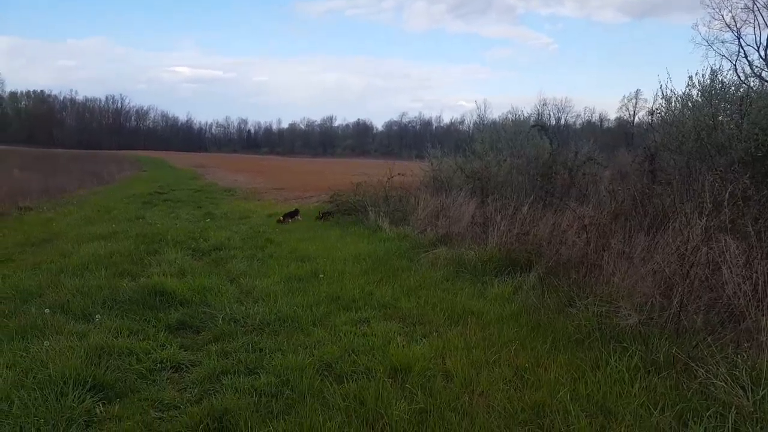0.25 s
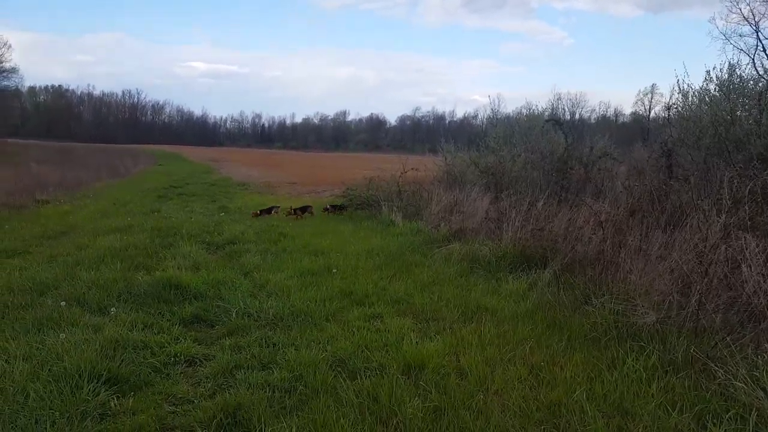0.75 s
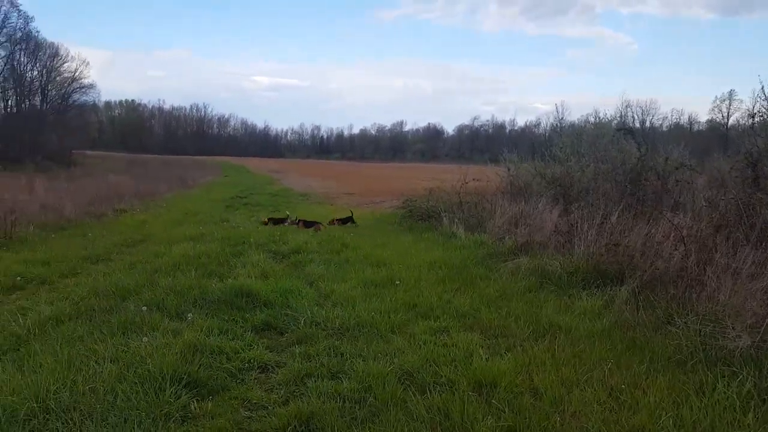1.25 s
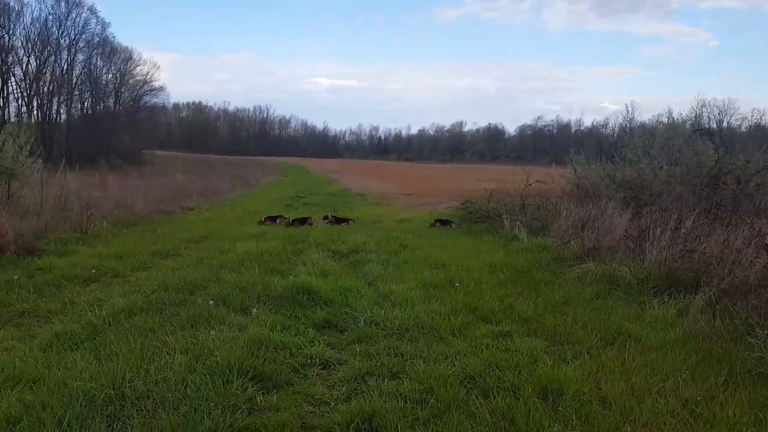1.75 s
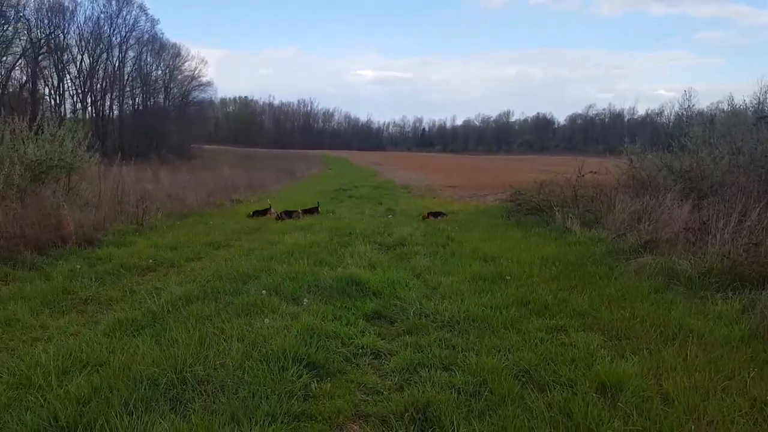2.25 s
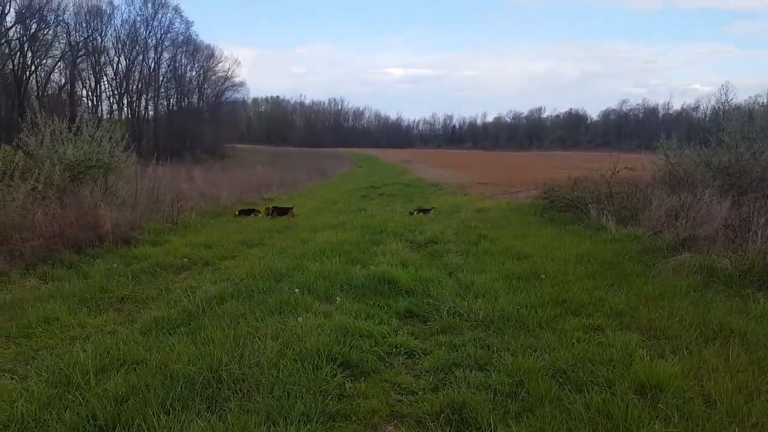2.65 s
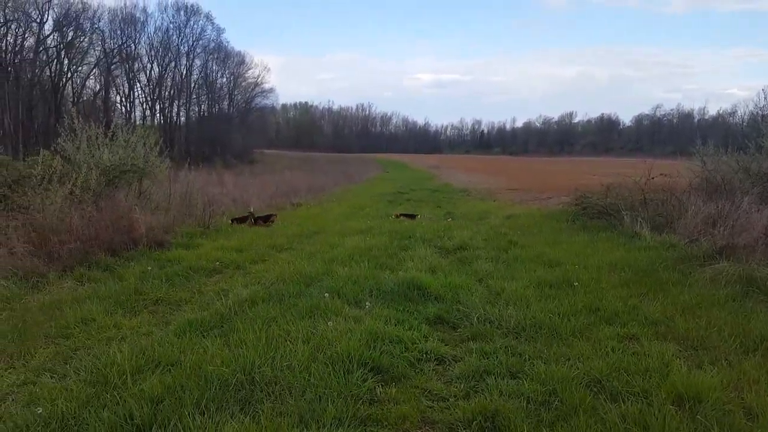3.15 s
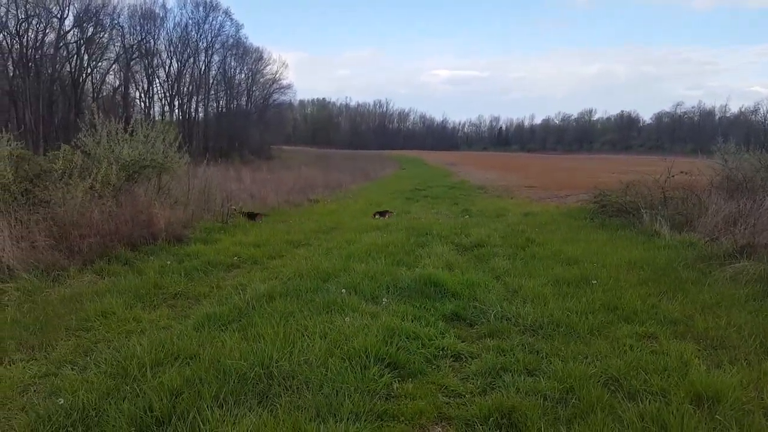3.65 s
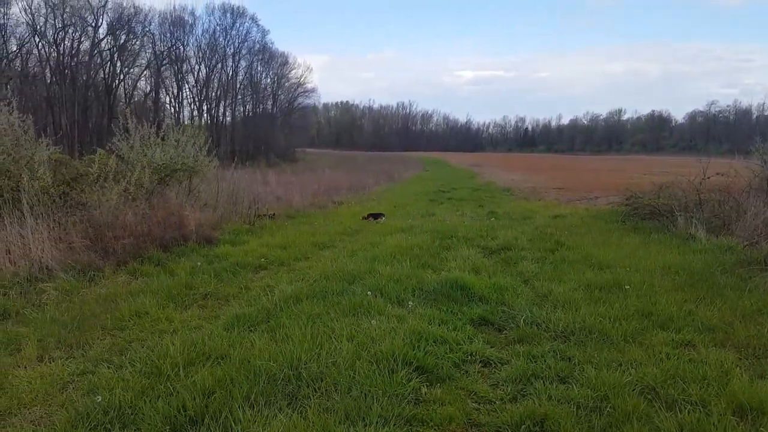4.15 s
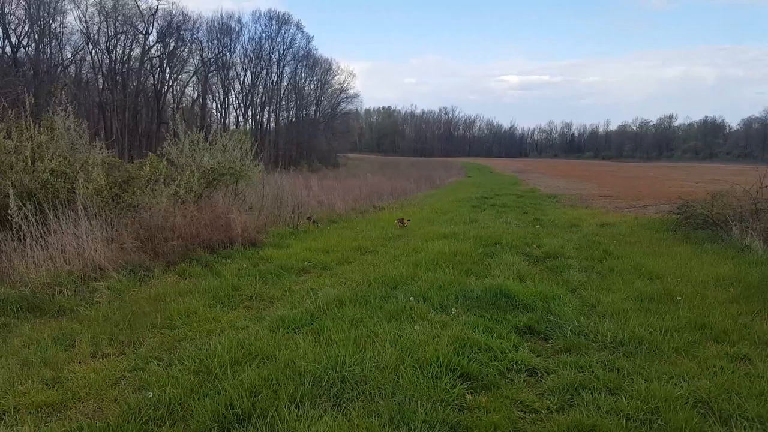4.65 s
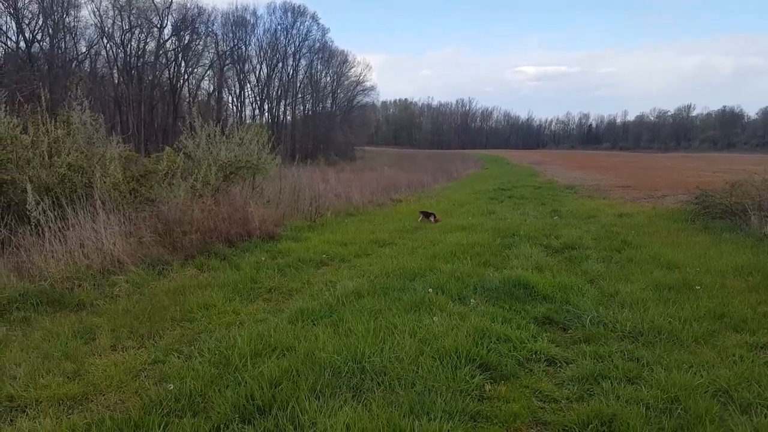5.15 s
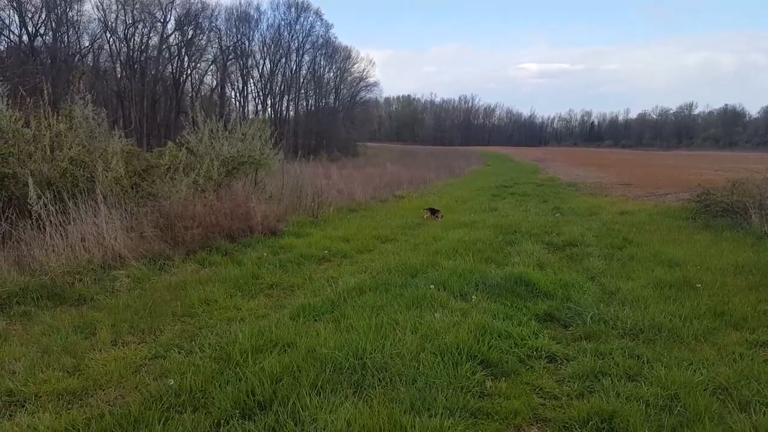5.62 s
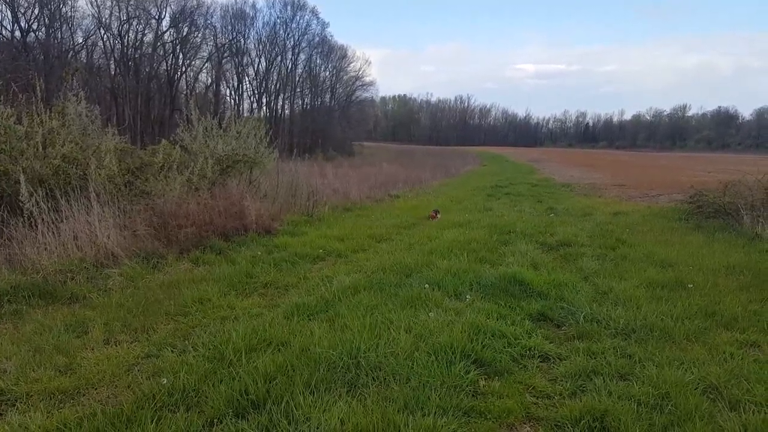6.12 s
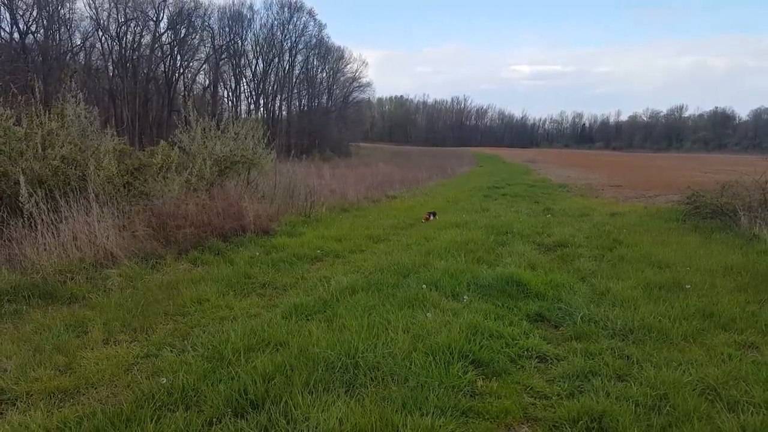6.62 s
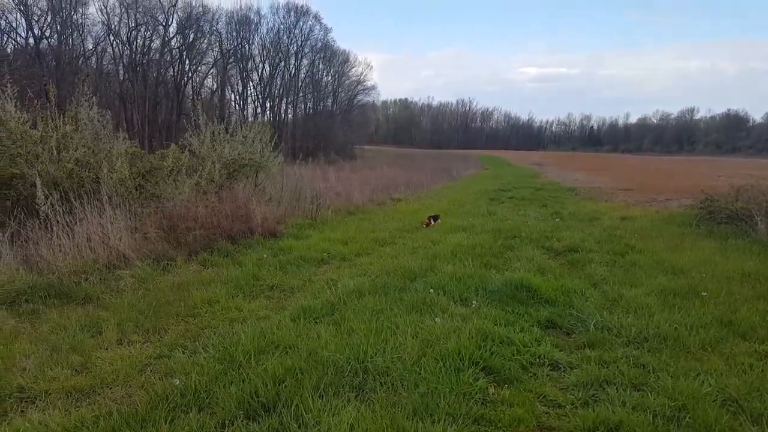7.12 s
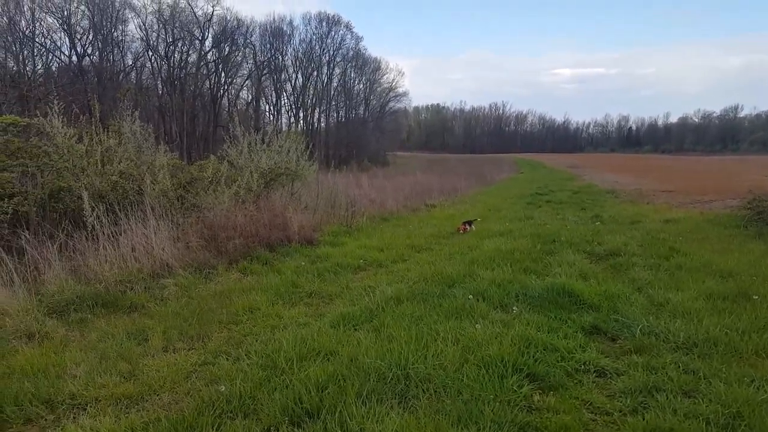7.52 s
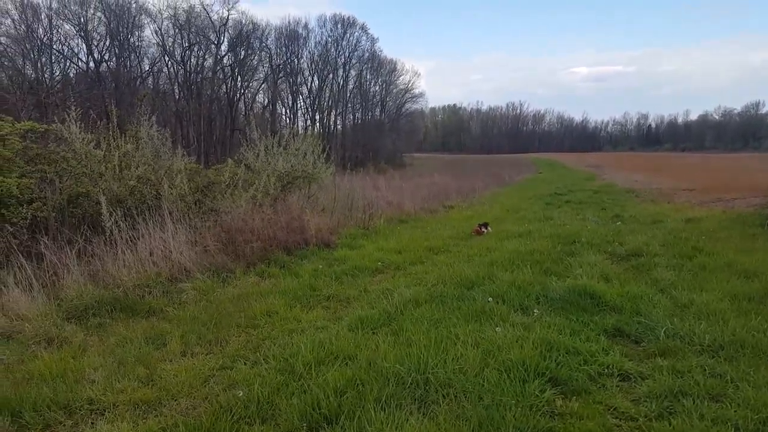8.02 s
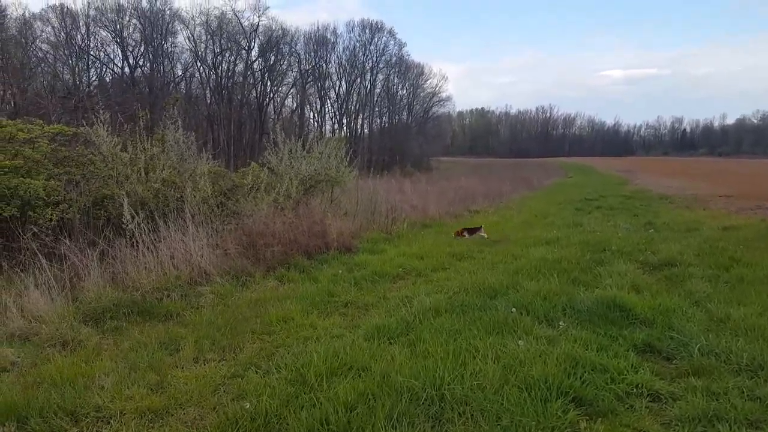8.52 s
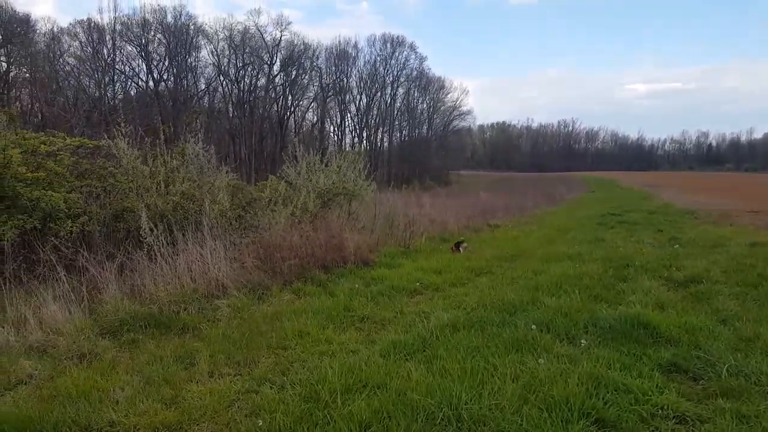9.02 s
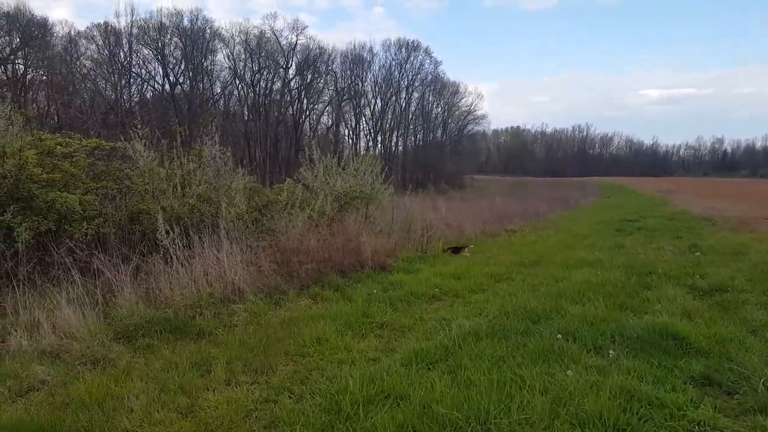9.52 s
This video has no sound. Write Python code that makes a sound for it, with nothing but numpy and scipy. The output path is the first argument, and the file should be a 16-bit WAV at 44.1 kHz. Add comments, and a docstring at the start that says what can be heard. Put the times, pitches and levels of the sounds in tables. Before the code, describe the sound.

A pack of hounds bays, yelps and barks hoarsely across an open field, pausing mid-way while birds whistle, then resuming with woodland echoes.

```python
"""A pack of hounds crosses a field some way off, and the tree lines answer: bays and yelps are stacks of
sine partials on a sliding pitch, barks an uneven mouth resonance with broken partials and pulsed noise.
Birds whistle in gliding sines and an insect trills; grass crackles near the microphones as shaped noise,
with snaps, knocks and a thin ping. Filtered noise makes the distant rumble, wind, low drone and far
engine. Noise echoes spread the calls through the woods; phase leads place them between two microphones."""
import sys
import numpy as np
from scipy import signal
from scipy.fft import rfft, irfft, next_fast_len
from scipy.io import wavfile
from scipy.ndimage import uniform_filter1d, map_coordinates

SR = 44100
rng = np.random.default_rng(int(sys.argv[2]) if len(sys.argv) > 2 else 0)


def transcribe(u):
    """Save the signal u as a 16-bit wav file named by the first command-line argument.

    u: samples, shape (n,) or (channels, n), limited to [-1, 1]; the rate is SR.
    q: integer samples, one column per channel.
    """
    v = np.clip(np.atleast_2d(u).T, -1, 1)
    q = np.round(v * 32767).astype(np.int16)
    wavfile.write(sys.argv[1], SR, q)


N = 430857
T = np.arange(N) / SR
TOP_HZ = 15830  # band limit
FALL_DULLS_DB = -4.5  # extra loss of overtones as a call falls away

# slope of the hounds' throats: freq_hz, relative_db
THROAT = [(500, -2.5), (1200, 5.5), (1700, -4.5), (2200, -16.5), (2800, -17.5), (3300, -25.5),
          (4500, -23.5), (6000, -39.5), (9000, -47.5), (15000, -78.5)]
# noisy body of a hoarse voice: freq_hz, relative_db
RASP = [(150, -52.5), (250, -35.5), (318, -11), (397, -24.5), (589, -9.5), (736, 1.5), (858, -7),
        (1480, -14), (2440, -19), (4300, -40.5), (5950, -36), (15000, -67)]


def amp(db):
    """Decibels to amplitude."""
    return 10 ** (np.asarray(db) / 20)


def unit(x):
    """Scale to an rms of one."""
    return x / np.sqrt(np.mean(x ** 2) + 1e-20)


def along(points, hz):
    """Read a curve of (Hz, value) points on a log frequency axis."""
    f, v = np.transpose(points)
    return np.interp(np.log(hz + 1), np.log(f + 1), v)


def span(rows, edge=.003):
    """Sample slice, times, soft ends (edge in s) and one curve per column of a call."""
    s, *cols = np.transpose(rows)
    cut = slice(max(0, round(s[0] * SR)), min(N, round(s[-1] * SR)))
    t = T[cut]
    ends = np.clip(np.minimum(t - s[0], s[-1] - t) / edge, 0, 1)
    return cut, t, ends, [np.interp(t, s, c) for c in cols]


def wobble(rate, size=N):
    """A smooth random curve, rate knots a second."""
    knots = rng.standard_normal(int(size * rate / SR) + 4)
    return map_coordinates(knots, [np.arange(size) * rate / SR])


def filtered(x, response):
    """Shape the spectrum of x by a response of frequency, which may be complex."""
    m = next_fast_len(x.shape[-1] + 8192)
    return irfft(rfft(x, m) * response(np.fft.rfftfreq(m, 1 / SR)), m)[..., :x.shape[-1]]


def phase(hz):
    """Running phase in radians of a changing pitch."""
    return 2 * np.pi * np.cumsum(hz) / SR


def stack(hz, multiples, dbs, shimmer_db):
    """Partials of one voice; they tremble in level and phase, the high ones most."""
    turn = phase(hz)
    out = np.zeros(len(hz))
    for k, db in zip(multiples, dbs):
        height = k * np.mean(hz) / 2500
        tremble_db = shimmer_db * (1 + height) * np.tanh(wobble(70, size=len(hz)))
        blur = .45 * height ** 2 * wobble(150, size=len(hz)) + rng.uniform(0, 2 * np.pi)
        level = np.sqrt(2) * amp(db + tremble_db) * (k * hz < TOP_HZ)
        out += level * np.sin(k * turn + blur)
    return out


def pulsed_noise(hz):
    """Air noise let through once a cycle by the vocal folds."""
    return (1 + np.cos(phase(hz))) * rng.standard_normal(len(hz))


def breath(hz, db):
    """Pulsed air noise, coloured by the throat."""
    return amp(db) * unit(filtered(pulsed_noise(hz), lambda f: amp(along(RASP, f))))


def high_voice(calls):
    """A higher register than the bays: few, widely spaced partials down the throat's slope."""
    out = np.zeros(N)
    for rows in calls:
        cut, t, ends, (hz, *dbs) = span(rows)
        hz = hz * (1 + .002 * wobble(60, size=len(t)))
        second_throat_db = along(THROAT, 2 * hz)
        dbs += [dbs[1] - 11.5 + along(THROAT, k * hz) - second_throat_db for k in range(3, 10)]
        out[cut] += ends * (stack(hz, range(1, 10), dbs, shimmer_db=1.2) + breath(hz, dbs[0] - 24))
    return out


def yelp_shape(s, length, start_hz, mid_hz, end_hz, start_db, end_db, second_db, scoop, drop):
    """Scoop in, hold, drop away: rows (s, Hz, dB of partials 1, 2); wider pitch travel takes longer."""
    shortest_s, scoop_s_per_share, drop_s_per_share = .006, .03, .045
    scoop_db, drop_db = -10, -22.5
    mid_share = .42  # the middle pitch is reached a little early
    scoop_s = shortest_s + scoop_s_per_share * abs(1 - scoop)
    drop_s = 2 * shortest_s + drop_s_per_share * abs(1 - drop)
    return [(s - scoop_s, scoop * start_hz, start_db + scoop_db, second_db + scoop_db),
            (s, start_hz, start_db, second_db),
            (s + mid_share * length, mid_hz, (start_db + end_db) / 2, second_db),
            (s + length, end_hz, end_db, second_db),
            (s + length + drop_s, drop * end_hz, end_db + drop_db, second_db + drop_db + FALL_DULLS_DB)]


def yelps():
    """Short high yelps, each bending into and out of its held pitch."""
    # held part of each yelp: start_s, length_s, start_hz, mid_hz, end_hz, start_db, end_db,
    # second_partial_db, scoop_from (share of start_hz), drop_to (share of end_hz)
    yelp_rows = [(0.0, .11, 1429, 1259, 1372, -28.5, -23, -33.5, .99, 0.7),
                 (0.283, 0.044, 1480, 1440, 1398, -30.5, -22.5, -77, .99, .8),
                 (.36, .38, 1180, 1045, 1159, -28, -25, -37, .7, 1.2),
                 (.46, .04, 1367, 1310, 1224, -39, -35.5, -34, .99, 1.4),
                 (0.738, 0.018, 1333, 1388, 1340, -33, -23, -48.5, .8, 0.42),
                 (1.042, .03, 1323, 1287, 1233, -32.5, -38, -27.5, 1, 0.85),
                 (1.2, 0.085, 1004, 1100, 1167, -28.5, -27.5, -37, 0.65, 1.1),
                 (1.471, .03, 1225, 1267, 1270, -24.5, -28, -32.5, .93, 1.8),
                 (1.56, 0.029, 1292, 1210, 1247, -39, -20, -37.5, 1, .86),
                 (1.98, 0.02, 1297, 1338, 1312, -24.5, -21.5, -47, .9, .55),
                 (2.675, .015, 1210, 1278, 1220, -26.5, -15, -47.5, .95, 0.69),
                 (2.152, 0.033, 1347, 1278, 1260, -30, -27, -44.5, .82, .99),
                 (2.236, .02, 1328, 1345, 1323, -30, -24.5, -67, 0.96, 0.35),
                 (2.297, .11, 1396, 1403, 1373, -27, -27.5, -31.5, .85, 0.7),
                 (2.733, 0.022, 1331, 1330, 1353, -23, -29, -40, 0.75, 0.87),
                 (2.805, 0.047, 1306, 1337, 1366, -19, -25.5, -41, 0.95, 0.28),
                 (3.552, 0.034, 1430, 1432, 1407, -39.5, -37, -51.5, 0.54, 3),
                 (4.173, .02, 1460, 1438, 1268, -26, -25.5, -40.5, 0.93, 0.67),
                 (6.336, .07, 1420, 1330, 1290, -29.5, -19, -47.5, 0.65, 1.5),
                 (6.586, 0.034, 1343, 1338, 1290, -26.5, -22, -44.5, 0.9, 0.95),
                 (6.887, .025, 1355, 1345, 1312, -37.5, -54.5, -32.5, 0.96, 1.4),
                 (6.986, 0.028, 1393, 1376, 1397, -24, -30, -48, 0.77, 1.01),
                 (7.214, 0.11, 1351, 1252, 1184, -29.5, -21.5, -34.5, 1, 0.69),
                 (7.903, 0.021, 1266, 1352, 1264, -38, -25, -40, .99, 0.61),
                 (8.33, .105, 1285, 1300, 1188, -31.5, -14.5, -45, 0.94, .93),
                 (8.37, .045, 1318, 1376, 1344, -20.5, -20.5, -29, 0.81, .95),
                 (8.443, 0.024, 1283, 1370, 1377, -33, -23, -28.5, 0.76, 0.53),
                 (8.862, 0.024, 1290, 1292, 1273, -21.5, -26, -35.5, 0.47, 0.75),
                 (9.348, 0.097, 1307, 1225, 1305, -32, -28.5, -43.5, 0.92, 2.5),
                 (9.469, 0.032, 1380, 1430, 1400, -20.5, -22, -30.5, 1, 0.74)]
    return high_voice([yelp_shape(*row) for row in yelp_rows])


def grass():
    """Crackly hiss with snaps, unlike in the two microphones; a few knocks and a ping decay in both."""
    # grass near the microphones: time_s, level_db
    rustle = [(0.0, -50.5), (0.3, -63), (0.8, -60.5), (1.6, -71.5), (2.47, -59.5), (2.99, -66),
              (4.76, -64.5), (5.06, -67.5), (5.71, -63.5), (5.9, -67), (7.67, -56), (8.03, -50.5),
              (8.57, -57.5), (9.77, -59.5)]
    # stalks snapping: start_s, level_db before the brightness filter
    snaps = [(0.0734, -28), (4.3517, -52.5), (4.6432, -43), (4.818, -49.5), (5.6414, -53), (5.7616, -44.5),
             (7.1457, -40.5), (7.672, -47.5), (7.7238, -35.5), (7.874, -45.5), (8.2013, -48),
             (8.2364, -31.5), (8.544, -36)]
    # soft knocks: start_s, centre_hz, level_db
    thuds = [(5.49, 800, -50.5), (5.6, 304, -41), (5.62, 950, -53), (6.0, 820, -49)]
    # one thin metal ping: start_s, pitch_hz, level_db, t60_s
    ping = (8.543, 13118, -47.5, 0.15)

    def bright(hz):
        return amp(along([(1500, -5), (5000, 1.5), (9000, -10.0), (13000, -10.0)], hz))

    crackle = amp(1.3 * wobble(31) + 3.0 * wobble(580)) * rng.standard_normal((2, N))
    out = amp(np.interp(T, *np.transpose(rustle))) * unit(filtered(crackle, bright))
    t = T[:SR // 8]
    for s, db in snaps:
        snap = amp(db - 60 * t / 0.044) * rng.standard_normal((2, len(t)))
        out[:, round(s * SR):][:, :len(t)] += filtered(snap, bright)[:, :N - round(s * SR)]
    for s, hz, db in thuds:
        puff = filtered(rng.standard_normal(len(t)), lambda f: 1 / (1 + ((f - hz) / 120) ** 2))
        strike = amp(db - 60 * t / 0.069) * np.minimum(t / 0.002, 1)
        out[:, round(s * SR):][:, :len(t)] += strike * unit(puff)
    s, hz, db, t60 = ping
    out[:, round(s * SR):][:, :len(t)] += amp(db - 60 * t / t60) * np.sin(2 * np.pi * hz * t)
    return out


def rumble():
    """Distant rumble nearly alike in both microphones, under a hush almost unrelated between them."""
    # distant rumble and hush: freq_hz, relative_db
    colour = [(15, -44), (48, -4.5), (110, 0), (227, -10.5), (365, -11.5), (815, -24), (1280, -30.5),
              (2100, -25), (3800, -28), (10000, -52.5), (13000, -79.5)]
    # likeness of left and right: freq_hz, likeness (0-1)
    alike = [(60, 1), (240, 0.93), (950, 0.45), (3770, 0.33), (15000, 0.04)]

    def mid_side(hz):
        turn = np.arccos(np.clip(along(alike, hz), -1, 1)) / 2
        return amp(along(colour, hz)) * [np.cos(turn), np.sin(turn)]

    mid, side = filtered(rng.standard_normal((2, N)), mid_side)
    return amp(-53.5) * unit(np.array([mid + side, mid - side]))


def wind():
    """Light wind buffets each microphone separately: lumpy low noise."""
    # wind at the microphones: time_s, level_db
    buffet = [(0.0, -58.5), (2.15, -59.5), (2.58, -64.5), (4.33, -63.5), (4.65, -63), (8.14, -66.5),
              (9.28, -51), (9.39, -49), (9.77, -57)]
    colour = [(25, -13), (60, -4.0), (180, -6.5), (400, -29)]  # freq_hz, relative_db
    lumps = amp(4.5 * wobble(24)) * rng.standard_normal((2, N))
    gusts = unit(filtered(lumps, lambda hz: amp(along(colour, hz))))
    return gusts * amp(np.interp(T, *np.transpose(buffet)))


def far_tones():
    """Narrow noise bands: a low far drone swells over the two wavering tones of a far engine."""
    # drone near 340 Hz: time_s, level_db before its wavering
    swells = [(0, -61), (4.4, -71.5), (5.6, -76), (6.1, -65), (6.7, -58), (7.4, -61), (9.77, -62.5)]
    # the engine's tones at 105 and 152 Hz: time_s, low_db, high_db
    engine = [(0.0, -57.5, -60.5), (1.499, -55, -58.5), (2.151, -76, -62.5), (2.45, -72, -55),
              (4.0, -68.5, -62), (6.121, -49.5, -66), (7.67, -65.5, -58), (9.468, -55.5, -63),
              (9.77, -75, -67)]
    drone = filtered(rng.standard_normal(N), lambda f: 1 / (1 + ((f - 340) / 90) ** 4))
    out = amp(np.interp(T, *np.transpose(swells)) + 2.5 * wobble(5.6)) * unit(drone)
    s, *dbs = np.transpose(engine)
    for hz, db in zip((105, 152), dbs):
        tone = filtered(rng.standard_normal(N), lambda f: 1 / (1 + ((f - hz) / 6) ** 2))
        out += amp(np.interp(T, s, db)) * unit(tone)
    return out


def barks():
    """Chaotic folds: the mouth rings unevenly; broken partials of a third of it flare over pulsed noise."""
    # hoarse barks: start_s, swell_s, fade_s, mouth_hz, mouth_db,
    # rasp_db (before the partials and noise add their own levels), hoarseness (share)
    bark_rows = [(.216, 0.034, 0.099, 745.5, -16, -30.5, 0.9), (.46, 0.044, 0.04, 735.6, -26.5, -31.5, 0.9),
                 (.801, 0.029, 0.11, 679.3, -15, -32, 0.8), (1.075, 0.013, 0.098, 756.5, -16.5, -33, 0.7),
                 (1.163, 0.017, 0.1, 764.6, -20, -30.5, 0.8), (1.488, 0.011, 0.11, 772.4, -18, -27.5, .55),
                 (1.83, 0.059, 0.06, 758, -26, -26.5, .8), (2.167, 0.039, 0.082, 712, -20, -34, 1),
                 (2.56, 0.066, 0.077, 754.6, -17, -33.5, 1.1), (2.739, .034, 0.059, 794, -20.5, -37, 1),
                 (3.262, 0.029, 0.1, 820, -24, -35, 0.7), (3.561, 0.054, 0.052, 828, -20.5, -34.5, 0.8),
                 (4.098, 0.049, 0.055, 817, -21, -33.5, 0.3), (4.485, 0.044, 0.09, 830, -17, -31, .35),
                 (6.331, 0.012, 0.012, 681, -24, -39.5, 0.8), (6.39, 0.007, 0.047, 683, -17.5, -41, 0.8),
                 (6.615, 0.017, 0.073, 717, -17, -34, 0.7), (6.909, .012, .084, 627.3, -16, -32, 0.5),
                 (7.581, 0.03, 0.1, 676.7, -21.5, -29.5, .8), (7.92, 0.026, .1, 685, -17, -35, 0.8),
                 (8.4, 0.033, .03, 730, -31.5, -29.5, 0.79), (8.876, 0.013, 0.14, 713, -28, -33, 0.5),
                 (9.346, 0.084, .06, 714, -13, -29.5, 0.9)]
    out = np.zeros(N)
    for s, swell, fade, mouth_hz, db, rasp_db, hoarse in bark_rows:
        # a sudden opening, a swell, then the breath runs out
        full = s + swell
        effort = [(s, -12), (full, 0), (full + 0.68 * fade, -4), (full + fade, -22)]
        cut, t, ends, (effort_db,) = span(effort, edge=0.00098)
        size = len(t)
        unsteady = 0.0603 * wobble(110, size=size) + .04 * wobble(15, size=size)
        hz = mouth_hz * (1 + hoarse * unsteady)
        ring = amp(9 * hoarse * np.tanh(wobble(130, size=size))) * np.sin(phase(hz))
        fold_hz = hz / 3 * (1 + .03 * hoarse * wobble(40, size=size))
        flare_dbs = [along(RASP, k * fold_hz) for k in range(1, 16)]
        flares = stack(fold_hz, range(1, 16), flare_dbs, shimmer_db=7.8 * hoarse)
        grain = unit(amp(5 * np.tanh(wobble(70, size=size))))
        rasp = amp(11) * unit(flares) + hoarse * grain * breath(fold_hz, 7)
        out[cut] += ends * amp(effort_db) * (amp(db) * unit(ring) + amp(rasp_db) * rasp)
    return out


def squeak_shape(s, length, hz, db):
    """Swell and climb: rows (s, Hz, dB of partials 1, 2)."""
    swell_db, climb, second_db = 9.5, 0.036, -14
    soft_db = db - swell_db
    return [(s, (1 - climb) * hz, soft_db, soft_db + second_db),
            (s + length, (1 + climb) * hz, db, db + second_db)]


def squeaks():
    """The thin squeak that opens most bays, in the high register."""
    # squeaks: start_s, length_s, mid_hz, end_db
    squeak_rows = [(0.435, 0.033, 955, -18), (1.791, .034, 884, -24), (2.371, 0.041, 859, -21),
                   (3.056, 0.037, 907, -23.5), (4.032, .02, 866, -20.5), (4.464, .034, 859, -12.5),
                   (7.232, 0.022, 895, -22.5), (7.903, .02, 944, -23), (9.48, 0.054, 954, -22.5)]
    return high_voice([squeak_shape(*row) for row in squeak_rows])


def bay_shape(held, third_db, fall_s, fall_to):
    """Jump in, hold, slide down: rows (s, Hz, dB of partials 1, 2, 3); an open mouth lifts the overtones."""
    rise_s, rise_from, rise_db = .009, .92, -6  # the voice jumps in from just below its pitch
    third_fades_db_per_s = 42.5  # the voice darkens as the breath runs down
    fall_db, halfway = -16.5, .3  # fade over the fall; share of the fall done at half time
    rows = []
    for s, hz, db, open_db in held:
        over_db = db + open_db
        rows.append((s, hz, db, over_db, over_db + third_db - third_fades_db_per_s * (s - held[0][0])))
    first, last = np.array(rows[0]), np.array(rows[-1])
    rise = first + [-rise_s, (rise_from - 1) * first[1], rise_db, rise_db, rise_db]
    # the third partial dulls most
    fall = np.array([0, (fall_to - 1) * last[1], fall_db, fall_db + FALL_DULLS_DB,
                     fall_db + FALL_DULLS_DB / halfway])
    later = np.array([fall_s, 0, 0, 0, 0])
    return [rise, *rows, last + later / 2 + halfway * fall, last + later + fall]


def bays():
    """Long bays: even partials follow the second down the throat's slope, odd ones the third."""
    # held part of each bay, one list a bay: time_s, pitch_hz, level_db, mouth_opening_db
    bay_rows = [
        [(0.474, 583, -20.5, -1), (0.524, 556.7, -23.5, 4), (0.596, 546, -20.5, -2), (0.612, 540, -28.5, 4),
         (0.652, 547, -27.5, -1.5), (0.665, 555, -25.5, 2)],
        [(0.685, 556, -25, 0), (0.769, 621.2, -23.5, -6), (0.843, 643.4, -17.5, -10.5),
         (0.865, 598, -18.5, 2.5), (0.885, 582, -24, -7), (0.901, 603, -32.5, 3), (0.92, 615, -34.5, 2)],
        [(1.215, 627, -19.5, -1.5), (1.229, 567, -24.5, -1.5), (1.267, 530.7, -29.5, 8), (1.301, 510, -31.5, 4),
         (1.343, 521.5, -28.5, 2.5), (1.381, 556, -26, -7), (1.39, 560, -34, 9.5)],
        [(1.832, 547.7, -28, 3), (1.858, 557, -32, 5.5), (1.888, 528, -32, 6.5), (1.896, 532, -28.5, 10),
         (1.904, 550, -37.5, 10), (1.958, 525.4, -29.5, 11), (1.986, 551.5, -32.5, 9.5)],
        [(2.415, 548.7, -28, 9), (2.453, 570, -22, -2), (2.495, 539.5, -25, 0.5), (2.563, 576.5, -27.5, -1.5),
         (2.585, 582.3, -26, 1), (2.657, 605.8, -27, -3.5), (2.676, 578, -28.5, 7)],
        [(3.098, 560.4, -22, -1.5), (3.152, 569, -18.5, -2.5), (3.224, 565.6, -19.5, -5.5),
         (3.25, 553.4, -23, 0)],
        [(3.314, 560.6, -26.5, -6), (3.334, 560.4, -42, 6), (3.348, 573.4, -31.5, 4.5),
         (3.41, 568.5, -38.5, 12.5)],
        [(3.632, 551, -31, 4), (3.716, 523.4, -28, 2), (3.742, 540.4, -26, -0.5), (3.802, 517.3, -33.5, 1.5),
         (3.82, 567, -28, -10.5), (3.856, 541.7, -22.5, -12.5), (3.878, 548, -31, -8)],
        [(4.048, 452.3, -52, 17), (4.062, 490, -37, 14.5), (4.08, 540, -39, 13.5), (4.104, 547.4, -35.5, 11.5),
         (4.146, 551.5, -37, 6), (4.164, 540.2, -39.5, 11.5), (4.185, 542, -47, 13)],
        [(4.504, 539, -29, 6.5), (4.528, 544.4, -34.5, 8), (4.558, 518.4, -42.5, 11), (4.59, 489, -38, 15)],
        [(7.257, 593.4, -24, 4), (7.339, 561.5, -24, 0), (7.409, 580.3, -26, 2.5), (7.497, 543, -31, 8),
         (7.531, 596, -20, -1), (7.607, 565, -24, 0), (7.62, 557, -31, 2)],
        [(7.938, 584.4, -17, -8), (7.952, 579.6, -25, 0.5), (7.972, 587, -15.5, 0), (7.98, 583, -33, 10),
         (7.986, 569, -19, -3.5), (8.052, 537.5, -30, 6)],
        [(8.892, 545, -27, 0), (8.904, 558, -24, 4.5), (8.916, 603, -26, -0.5), (8.932, 585.8, -21.5, 4),
         (9.066, 546, -25, -1), (9.082, 571, -27.5, -13), (9.096, 550, -27.5, 0)],
        [(9.527, 572.6, -23, -3.5), (9.559, 552.3, -24.5, 0.5), (9.675, 538, -25, -5),
         (9.695, 550.7, -30.5, 0.5), (9.717, 532, -31, 4), (9.737, 576, -26.5, -5.5),
         (9.765, 615.5, -19.5, -10.5)],
    ]
    # start and end of each bay: third_partial_db (from the second, at the start), fall_s,
    # fall_to (share of the last pitch)
    bay_ends = [(-6.5, 0.005, 0.7), (-3.5, .015, 0.69), (-7.5, 0.085, 0.58), (-7.5, .074, 0.67),
                (-15, 0.082, .84), (-11.5, 0.02, 0.75), (-0.5, 0.028, 0.21), (-14.5, 0.045, 0.62),
                (0.5, 0.016, 0.68), (-3.5, 0.022, 0.76), (-13.5, 0.11, 0.93), (-31, 0.075, 0.63),
                (-8, 0.056, 0.61), (-11, 0.055, 0.94)]
    # stretches where every second cycle weakens, so partials appear halfway: from_s, to_s,
    # half_db (from their neighbours), hiss_db (from the third partial)
    doubling = [(3.09, 3.239, -18, -37.5), (3.31, 3.42, -13, -24.5), (4.095, 4.178, -16, -34),
                (4.49, 4.621, -8, -16.5), (8.95, 9.075, -17, -18), (7.26, 7.344, -12, -24.5)]
    # treble hiss of the voice: freq_hz, relative_db
    spray = [(2500, -33), (4500, 4.5), (6000, -14), (9000, -4.5), (15000, -24)]
    clear_hiss_db = -28  # hiss from the third partial outside those stretches
    out = np.zeros(N)
    for rows in map(bay_shape, bay_rows, *np.transpose(bay_ends)):
        cut, t, ends, (hz, *dbs) = span(rows)
        hz = hz * (1 + .004 * wobble(60, size=len(t)))
        for k in range(4, 18):
            guide = 2 + k % 2
            dbs.append(dbs[guide - 1] + along(THROAT, k * hz) - along(THROAT, guide * hz))
        half_db = np.full(len(t), -80.0)
        hiss_db = np.full(len(t), float(clear_hiss_db))
        for a, b, halves_db, strained_db in doubling:
            doubled = (t > a) & (t < b)
            half_db[doubled] = halves_db
            hiss_db[doubled] = strained_db
        half_db = uniform_filter1d(half_db, size=400)
        # the lowest half partial has only one neighbour, so a faint one stands in below it
        halves = [half_db + (a + b) / 2 for a, b in zip([dbs[0] - 43] + dbs[:8], dbs[:9])]
        voice = stack(hz, range(1, 18), dbs, shimmer_db=2.5)
        voice += stack(hz, np.arange(9) + .5, halves, shimmer_db=8.0)
        out[cut] += ends * (voice + breath(hz, np.maximum(dbs[0], dbs[1]) - 24))
        hiss = filtered(pulsed_noise(hz), lambda f: amp(along(spray, f)))
        out[cut] += ends * amp(dbs[2] + hiss_db) * unit(hiss)
    return out


def woods(x):
    """Scattered echoes from brush and trees, different at each microphone."""
    # brush close by, then the tree lines: delay_s, relative_db
    echoes = [(0, -9.5), (.012, 28), (.03, -5), (.2, 0), (.35, -8), (.5, -7), (.8, -22), (1.4, -27)]
    # colour of the echoes: freq_hz, gain_db
    tone = [(150, -24), (320, -18.5), (500, -0.5), (1200, -9.5), (2500, 5), (4000, -13), (9000, -30)]
    t = np.arange(round(1.4 * SR)) / SR
    tail = amp(np.interp(t, *np.transpose(echoes))) * rng.standard_normal((2, len(t)))
    tail = tail + 0.1 * tail[::-1]
    wet = signal.fftconvolve(x[None], tail / np.linalg.norm(tail[0]), axes=1)
    # echoes past the end fold onto the start: the pack was already calling before it
    wet = wet[:, :N] + np.pad(wet[:, N:], ((0, 0), (0, N)))[:, :N]
    return filtered(wet, lambda hz: amp(along(tone, hz)))


def whistles():
    """One bird's falling whistle: a pure gliding tone with a catch near the top."""
    # the whistle's shape: time_s from its start, pitch_hz, relative_db
    glide = [(0, 5940, -7), (.072, 4280, -8.5), (.092, 3900, -31), (.112, 3590, -5), (.2, 2975, 2),
             (.275, 2420, -8.5), (.305, 2350, -15.5)]
    # each whistle: start_s, level_db
    starts = [(4.18, -54.5), (4.638, -57), (5.094, -55.5)]
    out = np.zeros(N)
    for s, start_db in starts:
        cut, t, ends, (hz, db) = span(np.add(glide, [s, 0, start_db]), edge=0.008)
        out[cut] += np.sqrt(2) * ends * uniform_filter1d(ends, size=250) * amp(db) * np.sin(phase(hz))
    return out


def insect():
    """A thin tone, steady at first, that breaks into wavering pulses near 23 a second."""
    # insect note: time_s, pitch_hz, level_db before the pulsing
    trill = [(4.65, 4230, -73), (5.1, 4170, -71), (5.9, 4100, -70.5), (6.6, 4060, -67)]
    out = np.zeros(N)
    cut, t, ends, (hz, db) = span(trill, edge=0.008)
    threshold = np.interp(t, [4.9, 5.3], [-1.1, -.2])
    pulses = 1.6 * (np.sin(phase(23 + 5 * wobble(6, size=len(t)))) > threshold)
    gate = uniform_filter1d(pulses * ends, size=250)
    out[cut] = np.sqrt(2) * ends * gate * amp(db) * np.sin(phase(hz))
    return out


def chirps():
    """Single gliding notes of other birds and a run of like notes: sines that move fastest at their end."""
    # single notes: start_s, length_s, start_hz, end_hz, level_db before a random spread
    chips = [(5.775, 0.036, 2290, 3650, -56.5), (6.171, 0.042, 2450, 3400, -53),
             (6.553, 0.049, 2770, 3520, -51.5), (6.987, 0.16, 3670, 2960, -52.5),
             (7.326, 0.12, 3660, 3260, -42)]
    # the run: first_s, spacing_s, length_s, start_hz, end_hz, level_db before a random spread
    run = (7.56, .088, .048, 4560, 3326, -46.5)
    out = np.zeros(N)
    first, spacing, *note = run
    # the run starts slower and settles
    run_notes = [(first + k * spacing + 0.092 * (1 - np.exp(-k / 5)), *note) for k in range(20)]
    for s, length, start_hz, end_hz, db in chips + run_notes:
        u = np.arange(round(length * SR)) / (length * SR)
        hz = start_hz + (end_hz - start_hz) * (1 - (1 - u) ** 0.78)
        swell = amp(db + rng.normal(0, 2.5)) * np.sin(np.pi * u) ** .5
        out[round(s * SR):][:len(u)] += swell * np.sin(phase(hz))
    return out


def placed(x, left):
    """A source further left leads in phase at the left microphone; a negative left leads at the right."""
    # lead of the left for left = 1: freq_hz, lead_radians
    lead = [(600, 0.062), (1200, 0.26), (1900, 0.89), (3450, 1.58), (6100, 3.44), (11000, 9.95),
            (16000, 15)]
    sides = np.array([[.5], [-.5]])
    return filtered(x, lambda hz: np.exp(1j * left * sides * along(lead, hz)))


def scene():
    """Place the calls across the field, add their echoes and the near grass, then the air around them."""
    # the two microphones differ in colour: freq_hz, left_minus_right_db
    balance = [(60, -15), (130, 0.5), (290, 1), (640, 0.5), (1410, -6), (3100, 0), (6820, 1), (15000, 14.5)]
    yelp = yelps() + squeaks()
    bark, bay = barks(), bays()
    song = whistles() + insect() + chirps()
    direct = placed(bay, left=1.66) + placed(yelp, left=0.066)
    direct += placed(bark, left=0.88) + placed(song, left=-0.64)
    far = direct + woods(amp(-8) * (bay + yelp + bark) + amp(-9.5) * song)
    sides = np.array([[.5], [-.5]])
    field = filtered(far + grass(), lambda hz: amp(sides * along(balance, hz)))
    return field + rumble() + wind() + far_tones()


def record(dry):
    """Loud peaks bend softly towards a ceiling; nothing passes above the band limit."""
    ceiling = .68
    squashed = dry / (1 + np.abs(dry / ceiling) ** 4) ** (1 / 4)
    return filtered(squashed, lambda hz: hz < TOP_HZ)


dry = scene()
out = record(dry)
transcribe(out)
```